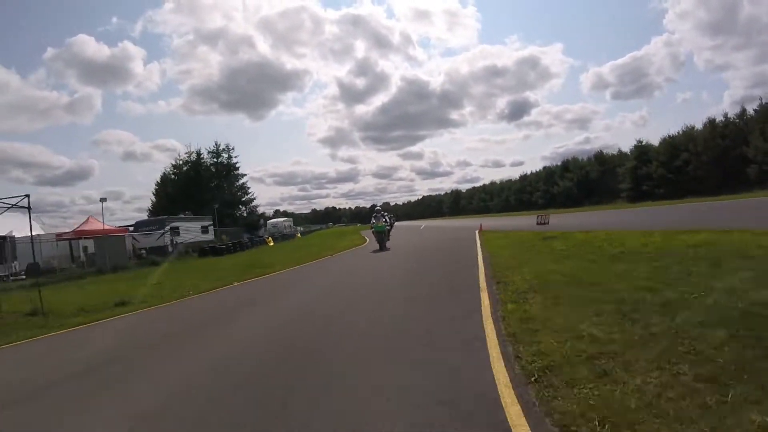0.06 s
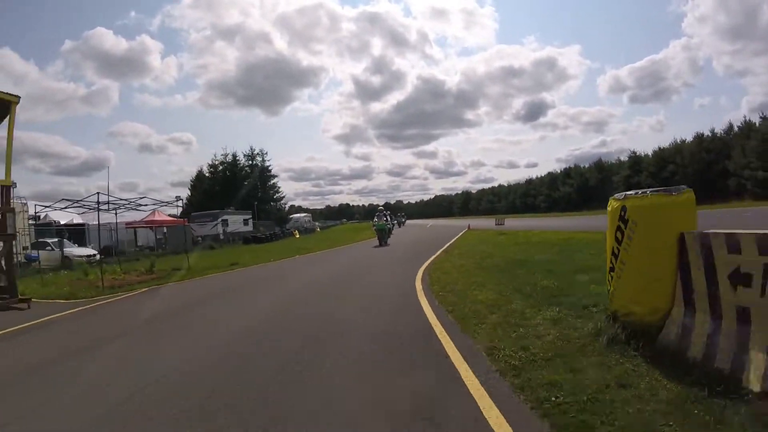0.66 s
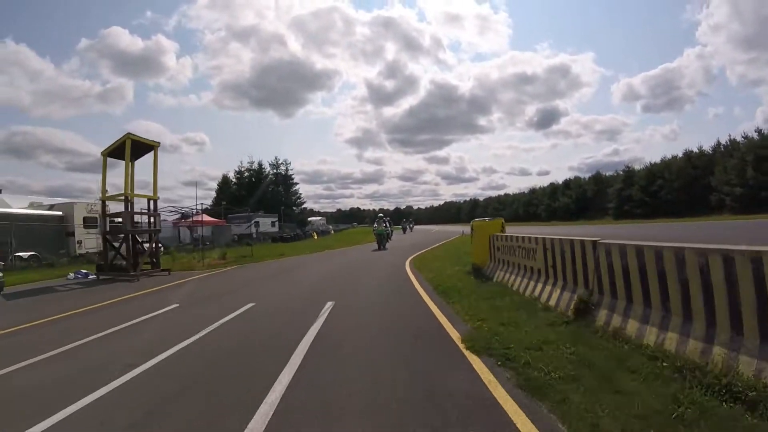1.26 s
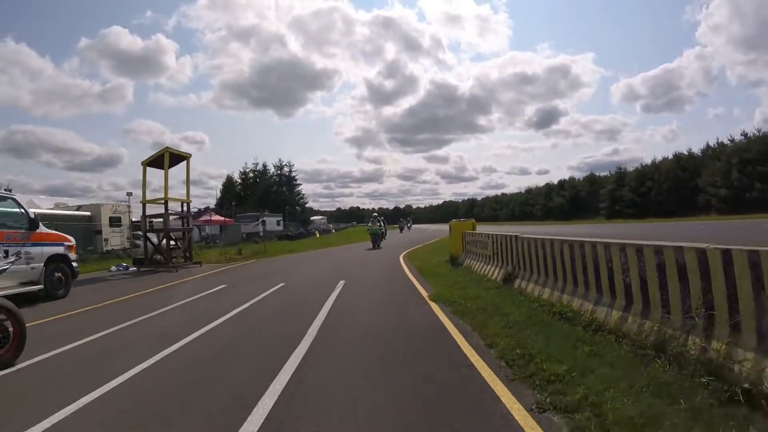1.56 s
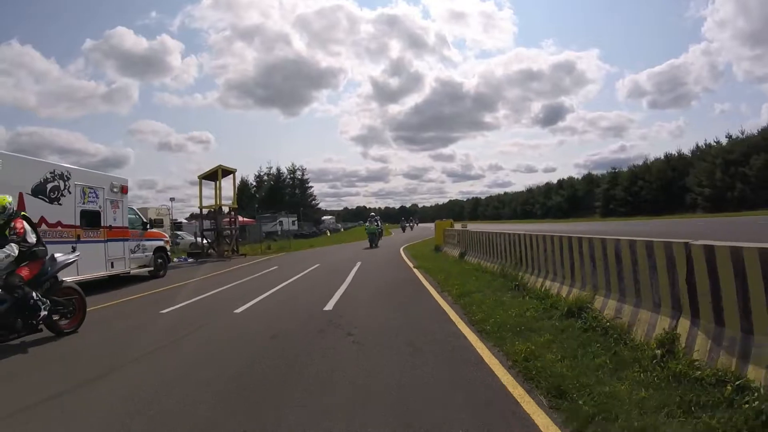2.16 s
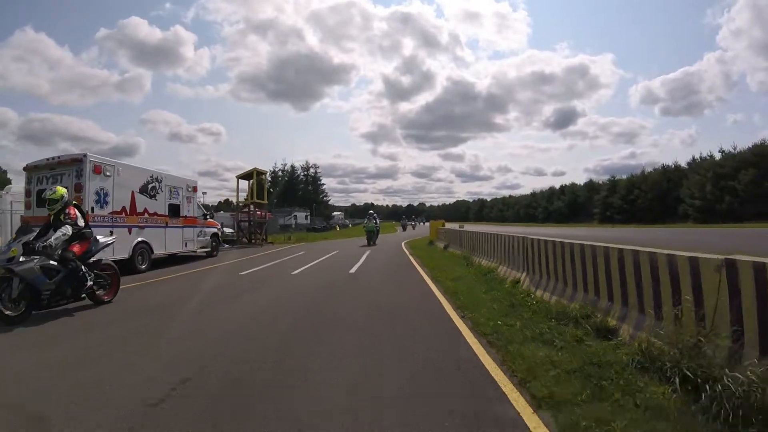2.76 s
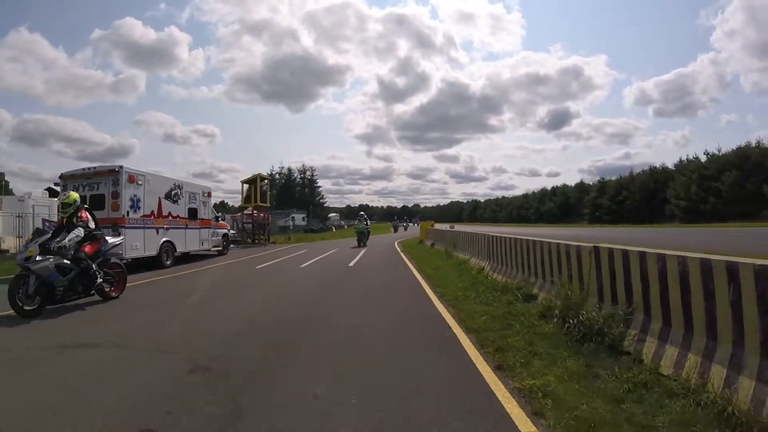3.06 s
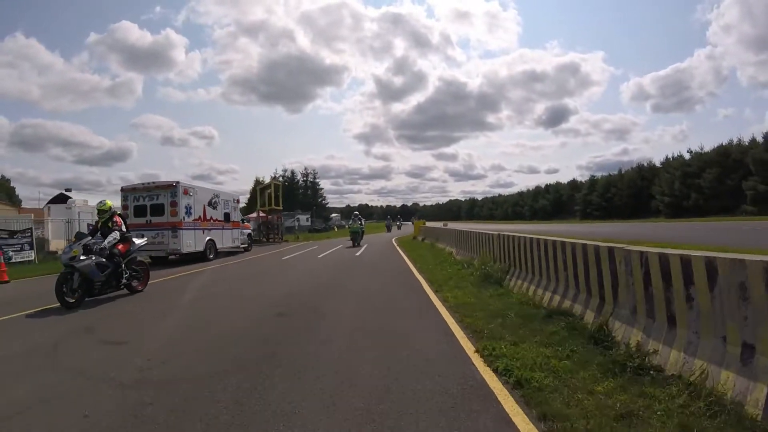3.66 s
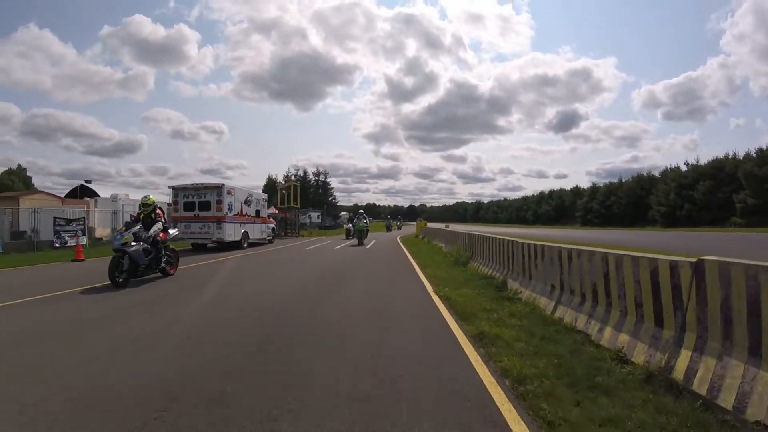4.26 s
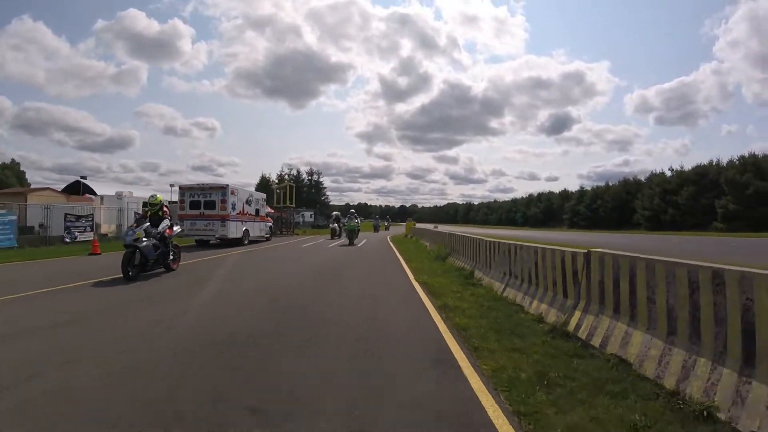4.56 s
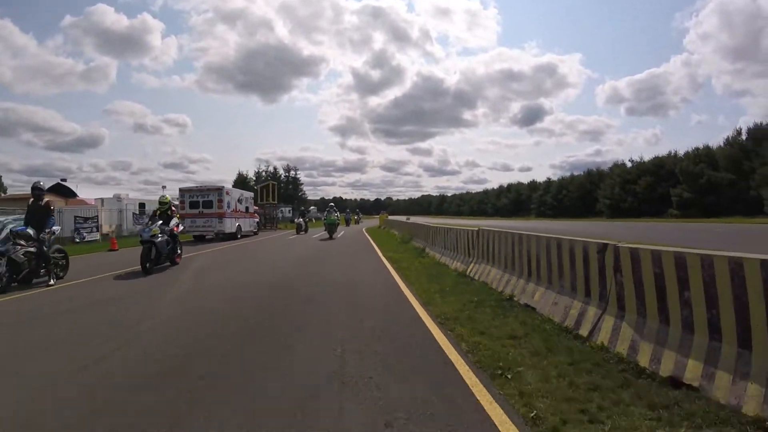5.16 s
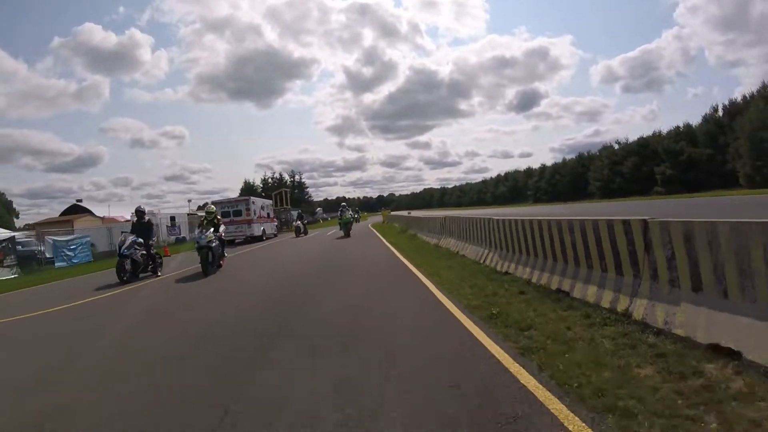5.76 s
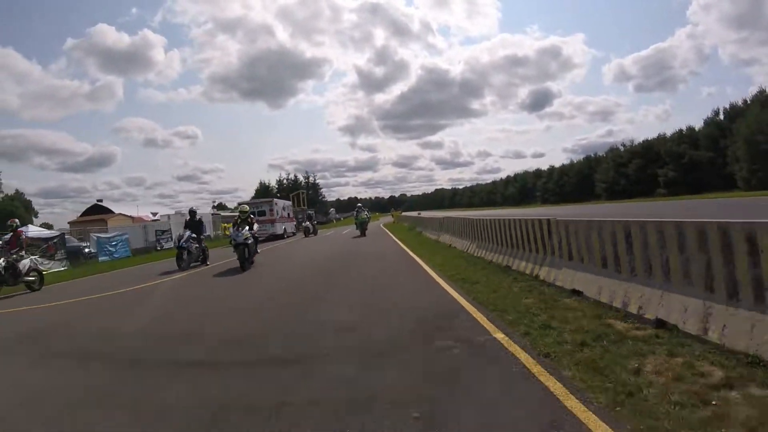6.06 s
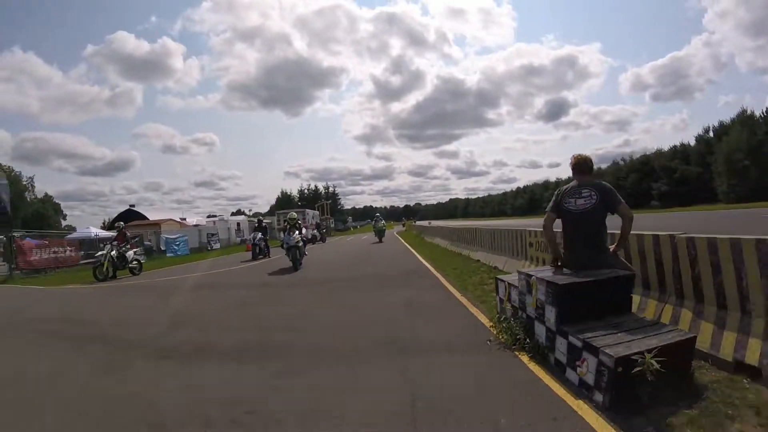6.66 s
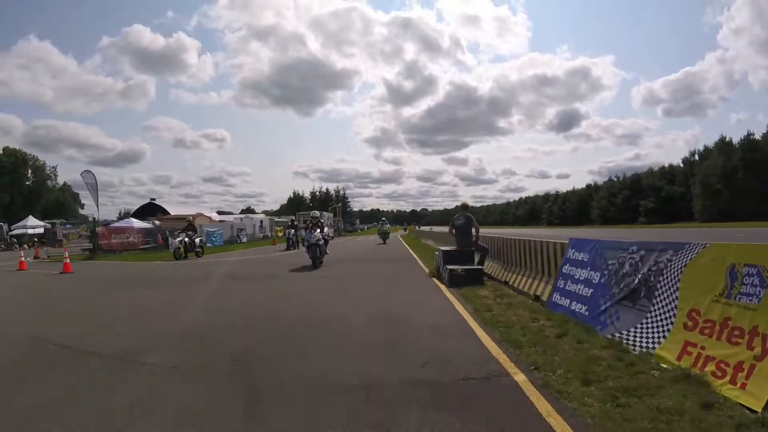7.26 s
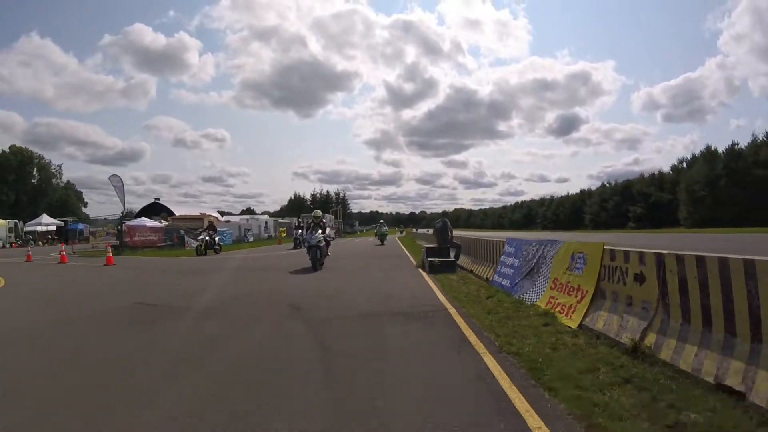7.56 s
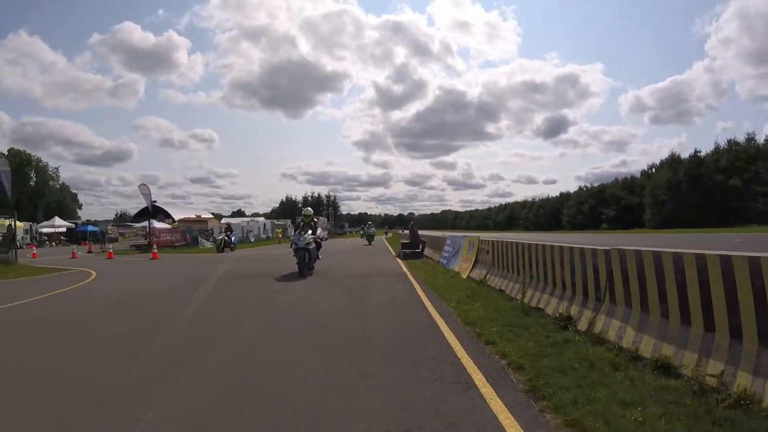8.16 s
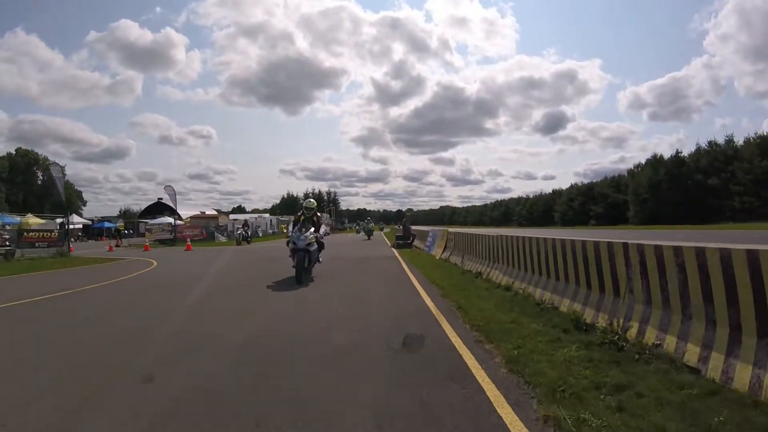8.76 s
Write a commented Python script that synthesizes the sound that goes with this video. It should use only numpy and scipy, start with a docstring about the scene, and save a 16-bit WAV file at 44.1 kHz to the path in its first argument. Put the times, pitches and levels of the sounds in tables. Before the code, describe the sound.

Close, on-board sound of a motorcycle moving slowly down a pit lane, with wind rumbling and tyres and chain hissing throughout. Its booming single-cylinder engine misfires as it slows, then idles with a metallic rattle while another bike's smoother drone sinks beside it. A sharp throttle blip leads into a short, louder pull. The revs fall to idle again as a second bike drones nearby, with a faint wash of idling engines behind.

```python
"""A single-cylinder motorcycle rolls slowly down a pit lane, heard from a small case fixed on the bike.
It coasts down with misfires to an idle, is blipped, pulls for two seconds and drops back.
Each firing sends a crack and a slower push of gas down the pipe, which barks and booms; in step with
the crank the gears whine, loose teeth and valves rattle and the frame shakes.
Two other bikes drone close by, over wind rumble, chain and tyre hiss and a wash of idling engines."""
import sys
import numpy as np
from scipy import signal
from scipy.fft import rfft, irfft, next_fast_len
from scipy.io import wavfile
from scipy.ndimage import uniform_filter1d, minimum_filter1d

SR = 44100
rng = np.random.default_rng(int(sys.argv[2]) if len(sys.argv) > 2 else 0)


def transcribe(u):
    """Save the signal u as a 16-bit wav file named by the first command-line argument.

    u: samples, shape (n,) or (channels, n), limited to [-1, 1]; the rate is SR.
    q: integer samples, one column per channel.
    """
    v = np.clip(np.atleast_2d(u).T, -1, 1)
    q = np.round(v * 32767).astype(np.int16)
    wavfile.write(sys.argv[1], SR, q)


N = 392490
TIME = np.arange(N) / SR
IDLE_HZ = 34   # firings per second

def from_db(db):
    """Decibels to gain."""
    return 10 ** (np.asarray(db) / 20)

def rms_one(x):
    """Scale to rms 1."""
    return x / np.sqrt(np.mean(x ** 2) + 1e-20)

def curve(rows, at=TIME, column=1):
    """One column of a breakpoint table, read at the given times."""
    columns = np.transpose(rows)
    return np.interp(at, columns[0], columns[column])

def lowpass(x, hz, order=2):
    """Butterworth low-pass."""
    return signal.sosfilt(signal.butter(order, hz, fs=SR, output="sos"), x)

def drift(rate_hz):
    """Smooth random modulation, rms 1."""
    return rms_one(lowpass(rng.standard_normal(N + SR), rate_hz)[SR:])

def noise(colour):
    """Noise of a given colour, rms 1."""
    hz, db = np.transpose(colour)
    size = next_fast_len(N, True)
    bins = np.maximum(np.fft.rfftfreq(size, 1 / SR), 1)
    gain = from_db(np.interp(np.log(bins), np.log(hz), db))
    return rms_one(irfft(rfft(rng.standard_normal(size)) * gain, size)[:N])

def resonate(x, modes):
    """Parallel resonators, each with its level at the peak."""
    out = np.zeros(N)
    for hz, width, db in modes:
        r = np.exp(-np.pi * width / SR)
        poles = [1, -2 * r * np.cos(2 * np.pi * hz / SR), r * r]
        out += from_db(db) * signal.lfilter((1 - r * r) / 2 * np.array([1, 0, -1]), poles, x + 1e-18)
    return out

def cycle_starts(cycles):
    """The samples at which a new engine cycle begins."""
    return np.flatnonzero(np.diff(np.floor(cycles)))

def puffs(at, sizes, rise_ms, lead_ms=0):
    """Smooth pulses that swell and die away; size is the area in pressure times ms."""
    train = np.zeros(N)
    train[np.clip(at - int(lead_ms * SR / 1000), 0, N - 1)] = sizes * SR / 1000
    r = np.exp(-1000 / (rise_ms * SR))
    return signal.lfilter([(1 - r) ** 2], [1, -2 * r, r * r], train + 1e-18)

# fader rides of the thin hiss and the engine wash: t/s, level/dB
SWELL_LEVEL = [(0, -80), (3.2, -68), (3.6, -57), (4.0, -53.5), (4.3, -72.5), (8.9, -77.5)]
WASH_LEVEL = [(0, -37.5), (1.6, -48.5), (2.8, -45), (3.6, -41.5), (4.1, -41), (4.5, -53.5), (8.9, -50)]
# their tone colours: f/Hz, level/dB
SWELL_COLOUR = [(2500, -24.5), (4200, -3), (5300, 0), (7000, -14.5), (9500, -19.5), (12000, -35.5)]
WASH_COLOUR = [(300, -11.5), (520, 0.5), (640, -6.5), (850, 0.5), (1070, -6.5), (1320, -5.5), (1600, -9.5),
               (3000, -17.5), (6000, -42)]

def parked_bikes():
    """A thin high hiss swells beside the parked bikes; their idling engines blur into a wash."""
    swell = from_db(curve(SWELL_LEVEL)) * noise(SWELL_COLOUR)
    wash = from_db(curve(WASH_LEVEL)) * noise(WASH_COLOUR)
    return swell + wash

# airflow over the case: t/s, level/dB
WIND_LEVEL = [(0, -25), (1.1, -23), (1.9, -25), (4.55, -23.5), (5.4, -33), (6.6, -32), (7, -26.5),
              (7.6, -29.5), (8.9, -27.5)]
# its tone colour: f/Hz, level/dB
WIND_COLOUR = [(15, -10.5), (30, 9), (52, 6.5), (80, 7.5), (120, 1.5), (250, 1.5), (380, -7), (550, -14.5),
               (1000, -56)]

def wind():
    """Air buffets the case into a low rumble."""
    return from_db(curve(WIND_LEVEL)) * noise(WIND_COLOUR)

# fader ride of the rolling hiss: t/s, level/dB
HISS_LEVEL = [(0, -45.5), (1.2, -43), (3.9, -42.5), (5.4, -41.5), (5.9, -45), (6.75, -41), (7.1, -47.5),
              (7.8, -47), (8.9, -43)]
# its tone colour: f/Hz, level/dB
HISS_COLOUR = [(300, 6.5), (620, 15.5), (870, 15.5), (1060, 12.5), (1300, 14.5), (1550, 9), (2100, 6.5),
               (2600, 6), (3300, 1.5), (3750, -4.5), (5000, 1.5), (6000, -0.5), (7200, -7.5), (8000, -13),
               (9400, -14.5), (10500, -21)]
# ring of the case: f/Hz, width/Hz, level/dB
CASE_MODES = [(2130, 150, -8), (3350, 200, -6), (6460, 230, 5)]

def chain_and_tyres(cycles, pulse_depth=.039, flicker_db=2):
    """Chain and tyres hiss through the ringing case, flickering and pulsing with the engine."""
    pulse = 1 + pulse_depth * np.cos(2 * np.pi * cycles - 1)
    hiss = noise(HISS_COLOUR) * pulse * from_db(flicker_db * drift(110))
    return from_db(curve(HISS_LEVEL)) * rms_one(hiss + resonate(hiss, CASE_MODES))

# two bikes close by, one track each: t/s, firing f/Hz, level/dB
NEIGHBOURS = [
    [(1.2, 177.8, -36.5), (1.5, 167, -27), (2.05, 137, -26), (2.5, 119.7, -29.5), (2.72, 112.9, -24),
     (3.5, 104, -21), (3.9, 104.5, -35), (4.3, 102, -42)],
    [(7.1, 178, -39), (7.5, 166.4, -26.5), (8.1, 151.7, -21.5), (8.5, 132.2, -25.5), (8.9, 111, -24)],
]

def neighbour(track, throb_db, throb_hz=3.9, throb_peak_s=3, overtone_db=-15):
    """A smooth multi-cylinder drone that sinks with its revs, with an optional slow throb."""
    phase = 2 * np.pi * np.cumsum(curve(track) * (1 + .006 * drift(12))) / SR
    drone = sum(from_db(overtone_db * k) * np.sin((k + 1) * phase) for k in range(3))
    heard = (TIME >= track[0][0]) & (TIME <= track[-1][0])
    throb = throb_db * np.cos(2 * np.pi * throb_hz * (TIME - throb_peak_s))
    return heard * from_db(curve(track, column=2) - 2 + throb + drift(14)) * rms_one(drone)

# frame shake, strongest at a crawl: t/s, level/dB
SHAKE_LEVEL = [(0, -45), (2.1, -38.5), (2.5, -20.5), (3.1, -20.5), (3.9, -22), (4.3, -43), (4.6, -53),
               (8.9, -48.5)]

def shake(cycles, uneven_db=1):
    """The unbalanced crank, two turns to a firing, rocks the frame unevenly."""
    return from_db(curve(SHAKE_LEVEL) + uneven_db * drift(6.2)) * np.sin(2 * np.pi * 2 * cycles)

def chatter(cycles, modes):
    """One short, uneven knock per cycle rings the metal; rms 1."""
    at = cycle_starts(cycles)
    knocks = puffs(at, from_db(rng.uniform(-2, 2, len(at))), rise_ms=2.8) * rng.standard_normal(N)
    return rms_one(resonate(knocks, modes))

# ring of the crankcase and of the cylinder head: f/Hz, width/Hz, level/dB
CRANKCASE_MODES = [(525, 50, 3), (810, 60, -2), (930, 55, 2.5), (1060, 70, 0), (1290, 110, 4),
                   (2120, 50, 0), (3320, 120, -11)]
HEAD_MODES = [(1050, 80, 1), (2120, 60, 1.5), (3320, 120, -12)]

def rattle(cycles, firing_hz, idle_db=-43, loss_db_per_hz=1.1):
    """Loose teeth knock at each firing and valves tick as they seat; both fade as the revs rise."""
    level_db = idle_db - loss_db_per_hz * np.maximum(firing_hz - IDLE_HZ, 0)
    teeth = chatter(cycles, CRANKCASE_MODES)
    valves = from_db(-5) * chatter(cycles - .72, HEAD_MODES)   # late in the cycle
    return from_db(level_db) * lowpass(teeth + valves, 3200)

# whine at the tooth rate, its octave (strongest as the wheel drives the engine)
# and its third partial (heard coasting down): t/s, level/dB
WHINE_ROOT = [(0, -43.5), (.9, -43), (1.4, -39.5), (2.2, -44), (3.2, -51), (4.1, -46.5), (4.45, -46),
              (4.7, -45), (5.1, -43), (6, -51), (6.5, -52.5), (6.95, -43.5), (7.2, -44.5), (7.8, -54),
              (8.9, -46.5)]
WHINE_OCTAVE = [(0, -55), (.7, -56), (.78, -49), (.85, -62), (.92, -52), (1.2, -51), (1.3, -45),
                (1.55, -48.5), (2.33, -49), (2.6, -60), (4.1, -60), (4.4, -54), (4.7, -56), (5.15, -51),
                (5.4, -62), (5.6, -54), (6.1, -61), (6.35, -55), (6.75, -52.5), (7, -57), (7.1, -50.5),
                (7.5, -55), (7.8, -64)]
WHINE_THIRD = [(0, -65), (.8, -65), (.9, -57.5), (1.45, -56.5), (1.6, -61), (2.2, -62), (2.6, -74)]
# pitch bends as the drive snatches: t/s, bend/share of gear speed
LURCHES = [(.78, -.04), (.855, .05), (.97, .03), (1.45, .02), (1.52, .03), (1.58, -.025), (1.63, .04),
           (1.69, -.025), (1.765, .045), (1.82, -.025), (1.89, .075), (1.96, -.035), (2.17, .06),
           (2.22, -.03), (2.32, .07), (5.02, .025), (5.17, -.02), (5.42, .02), (6.16, .04), (6.27, -.025),
           (6.76, -.035), (6.87, .025), (6.96, .04)]

def gears(cycles, firing_hz, teeth_per_firing=30.5, lurch_s=.024, wander_db=1.8):
    """Tooth whine bends with each lurch and flutters with the crank; backlash smears it at high revs."""
    lurch = sum(share * np.exp(-.5 * ((TIME - s) / lurch_s) ** 2) for s, share in LURCHES)
    crank = 2 * np.pi * cycles
    flutter = .55 * np.sin(crank) + .85 * drift(20)
    mesh = 2 * np.pi * teeth_per_firing * np.cumsum(firing_hz * (1 + lurch)) / SR + flutter
    backlash = np.minimum(1.2 * (firing_hz / 80) ** 3, 1.2)
    whine = np.zeros(N)
    for k, levels in enumerate((WHINE_ROOT, WHINE_OCTAVE, WHINE_THIRD), 1):
        gain = from_db(curve(levels) + wander_db * drift(12))
        tone = np.sin(k * mesh + backlash * drift(70))
        roughness = 1 + .4 * drift(130)
        whine += gain * tone * roughness
    throb = 1 + .45 * np.cos(crank)
    return lowpass(whine * throb, 6200, order=4)

# the rev line: t/s, firing f/Hz
REVS = [(0.0, 64.27), (0.33, 63.24), (.62, 62.5), (.77, 57.6), (.88, 60), (1.22, 57.36), (2.2, 42.24),
        (2.94, 35.37), (4.11, 32.76), (4.29, 69.61), (4.44, 87.36), (4.66, 57.31), (4.9, 80.03),
        (5.17, 88.4), (5.34, 99.8), (5.49, 100.8), (5.65, 88.6), (5.8, 82.7), (6.03, 80.86), (6.4, 69.52),
        (6.76, 78.82), (7.14, 51.53), (7.66, 33.78), (8.9, 34.54)]

def engine_speed(flywheel_s=.07):
    """Firings per second, the corners rounded by the flywheel."""
    return uniform_filter1d(curve(REVS), size=int(flywheel_s * SR), mode="nearest")

# stretches with the throttle shut: start t/s, end t/s
OVERRUN = [(.745, 1.955), (2.065, 2.09), (4.447, 4.7), (6.815, 7.07)]

def throttle_shut(when):
    """1 on the overrun, else 0."""
    return sum((when > start) & (when <= end) for start, end in OVERRUN)

# bursts of overrun pops: t/s, count, spacing/cycles, level/dB, growth per pop/dB
POPS = [(.805, 2, 1, 1.5, -5), (.885, 2, 1, 3.5, -7), (.953, 2, 1, 4, -8), (1.02, 2, 1, -9, 1),
        (1.072, 1, 1, 1, 0), (1.106, 6, 2, -2, .4), (1.316, 4, 2, -1, 0), (1.5, 3, 1, 0, .5),
        (1.596, 4, 1, -4, 2), (1.714, 4, 1, -3, 1.5), (1.837, 4, 1, -3, 2.3), (4.677, 1, 1, -1, 0),
        (6.86, 1, 1, -3, 0), (6.875, 2, 1, 1.5, -5), (6.948, 1, 1, 0, 0), (7.01, 2, 1, -5, 0),
        (7.062, 1, 1, -2, 0)]

def burning(when, pop_trim_db=-1):
    """Which cycles ignite, and their extra dB: all under throttle, only the pops on the overrun."""
    burns, extra_db = throttle_shut(when) == 0, np.zeros(len(when))
    for s, count, spacing, db, growth_db in POPS:
        k = np.arange(int(count))
        caught = np.argmin(np.abs(when - s)) + int(spacing) * k
        burns[caught] = True
        extra_db[caught] = pop_trim_db + db + growth_db * k
    return burns, extra_db

def surging(cycles, kick_hz=1.6):
    """Among misfires each burn kicks the crank faster and each dead cycle lets it sag."""
    when = cycle_starts(cycles) / SR
    burns = burning(when)[0].astype(float)
    gained = np.cumsum(burns - uniform_filter1d(burns, size=9))
    ripple_hz = kick_hz * (gained - uniform_filter1d(gained, size=9))
    return cycles + np.cumsum(np.interp(TIME, when, ripple_hz)) / SR

# how hard the engine works for its speed: t/s, level/dB
EFFORT = [(0, 3), (.5, 2), (.72, -1.5), (.9, 0.5), (1.4, 3.5), (2.6, 1), (4.15, 3.5), (5.1, 3.5), (5.5, -1),
          (5.95, -2), (6.7, 0), (7.3, -2.5), (8.9, 1.5)]

def load(firing_hz, pull_hz_per_s=95, lean_below_hz=69.5):
    """Effort, crack and push in dB, leanness 0-1: at idle the crack fades and the push is strongest."""
    effort_db = curve(EFFORT)
    above_idle_hz = np.maximum(firing_hz - IDLE_HZ, 0)
    pull = np.tanh(np.gradient(firing_hz) * SR / pull_hz_per_s)
    crack_db = 2 + .53 * effort_db - 28.5 * np.exp(-above_idle_hz / 16.4) - pull
    push_db = -4 + effort_db - 12 * (above_idle_hz / 60) ** 2
    lean = np.clip((lean_below_hz - firing_hz) / 3.7, 0, 1) * (1 - np.maximum(pull, 0))
    return np.array([effort_db, crack_db, push_db, lean])

# low body of the pipe: f/Hz, width/Hz, level/dB
BOOM_MODES = [(34.2, 21, -8), (72, 33, -6), (105.8, 35.5, 1.5), (142, 56, -3.5), (201.5, 33, -6.5),
              (278, 61, 2.5), (327, 270, -20.5)]

def boom(flow):
    """The piston's slow shove of gas rings the pipe's low modes."""
    return lowpass(resonate(flow, BOOM_MODES), 325, order=4)

# dead notes of the silencer: f/Hz, width/Hz
NULLS = [(622, 51), (1075, 16)]

def silencer(x):
    """Notches where waves from the two ends of the silencer cancel."""
    for hz, width in NULLS:
        x = signal.lfilter(*signal.iirnotch(hz, hz / width, fs=SR), x)
    return x

# open ring of pipe and silencer: cool f/Hz, width/Hz, level/dB, change when hot/dB
PIPE_MODES = [(130, 10, -16.5, -2), (202, 79, -1.5, 2.5), (313.6, 30, -1.5, 3.5), (361.3, 48.5, 8, 0),
              (407.7, 53, -7, -11.5), (477.4, 48, 2.5, 1), (517, 16, -5.5, 4), (674, 48, -2.5, -3.5),
              (778, 35, -5, 1), (852, 67, -9, -7.5), (945, 30, -5, 3), (1168, 117, -1, -1),
              (1275, 27, 2.5, 1.5), (1328, 15, -6, -9), (1710, 200, -9.5, 6), (2730, 860, -34.5, 1.5)]
# hollow ring with the throttle nearly shut: f/Hz, width/Hz, level/dB
HOLLOW_MODES = [(367, 25, 16.5), (924, 36, 5), (1337, 42, 6.5)]

def bark(blast, suck, heat, firing_hz, hot_rise=.042, hollow_below_hz=65.6):
    """Sharp gas pulses ring the pipe: higher when hot, hollow at low revs and on dead cycles."""
    cool_pipe = [mode[:3] for mode in PIPE_MODES]
    hot_pipe = [(hz * (1 + hot_rise), width, db + hot_db) for hz, width, db, hot_db in PIPE_MODES]
    gas = blast + suck
    open_ring = resonate(gas * (1 - heat), cool_pipe) + resonate(gas * heat, hot_pipe)
    coasting = np.clip((hollow_below_hz - firing_hz) / 5.6, 0, 1)
    hollow = resonate(suck + from_db(-5) * coasting * blast, HOLLOW_MODES)
    return lowpass(silencer(from_db(-2 * coasting) * open_ring + hollow), 2400)

def exhaust(cycles, firing_hz, jitter_ms=.083, hot_from_hz=75.7,
            dead_crack_db=-27, dead_push_db=-8, pop_push_db=-2):
    """Each cycle the valve lets out a turbulent crack and a slower push; the pipe barks and booms."""
    at = cycle_starts(cycles)
    effort_db, crack_db, push_db, lean = load(firing_hz)[:, at]
    crack_luck, push_luck, draw_luck, timing_luck = rng.standard_normal((len(at), 4)).T
    at = at + (timing_luck * jitter_ms * SR / 1000).astype(int)
    burns, pop_db = burning(at / SR)
    shut = throttle_shut(at / SR)
    lean = lean * (1 - .5 * shut)
    spread_db = 1.3 * lean   # a lean mixture burns unevenly
    cracks = from_db(crack_db + spread_db * crack_luck + np.where(burns, pop_db, dead_crack_db))
    pushes = from_db(push_db + spread_db * push_luck + np.where(burns, pop_push_db * shut, dead_push_db))
    # the harder and hotter a cycle burns, the steeper its front: top revs turn raspy
    heat = np.clip((firing_hz - hot_from_hz) / 25.3, 0, 1)
    scatter = (.15 + .022 * lean) * crack_luck
    steep = np.clip(.17 + .02 * effort_db + .099 * heat[at] ** 2 + scatter, 0, 1)
    sharp_crack = puffs(at, cracks * steep, rise_ms=.17)
    soft_crack = puffs(at, cracks * (1 - steep), rise_ms=.4, lead_ms=.25)
    jet = puffs(at, cracks * steep, rise_ms=.8) * lowpass(rng.standard_normal(N), 1900, order=4)
    blast = sharp_crack + soft_crack + jet
    push = puffs(at, pushes, rise_ms=.75, lead_ms=2.52)
    # the intake gulps half a cycle later, whether the charge burns or not
    gulp = puffs((at[:-1] + at[1:]) // 2, -from_db(push_db - 15 + 2.1 * draw_luck)[:-1], rise_ms=1)
    # a dead cycle sucks gas back from the pipe, which still rings it dully
    suck = puffs(at, -from_db(-11 + 2 * draw_luck) * ~burns, rise_ms=.7)
    return from_db(-7.5) * bark(blast, suck, heat, firing_hz) + from_db(1.5) * boom(push + gulp)

def scene():
    """One crank drives exhaust, gears, rattle and shake, over the bed of the lane and two other bikes."""
    firing_hz = engine_speed()
    cycles = surging(np.cumsum(firing_hz) / SR - .14 + firing_hz * .0011)
    engine = exhaust(cycles, firing_hz)
    mechanics = gears(cycles, firing_hz) + rattle(cycles, firing_hz) + shake(cycles)
    others = neighbour(NEIGHBOURS[0], throb_db=5.5) + neighbour(NEIGHBOURS[1], throb_db=0)
    bed = wind() + chain_and_tyres(cycles) + parked_bikes()
    return (bed + others + mechanics + engine)[None]

def limiter(x, ceiling=.51, release_db_per_s=250):
    """Ducks just ahead of each peak over the ceiling and recovers quickly."""
    over_db = 20 * np.log10(np.maximum(np.abs(x) / ceiling, 1))
    ramp = release_db_per_s * TIME
    held_db = np.maximum.accumulate(over_db + ramp, axis=-1) - ramp
    return x * from_db(uniform_filter1d(minimum_filter1d(-held_db, size=65), size=65))

def record(dry, low_cut_hz=12, high_cut_hz=10900):
    """The case delays the deep bass, so pulses swing up, then sharply down; low cut, limiter, high cut."""
    r = np.exp(-2 * np.pi * 35 / SR)   # all-pass turning at 35 Hz
    cased = signal.lfilter([r, -1], [1, -r], dry)
    trimmed = signal.sosfilt(signal.butter(1, low_cut_hz, "high", fs=SR, output="sos"), cased)
    return signal.sosfilt(signal.cheby2(12, 60, high_cut_hz, fs=SR, output="sos"), limiter(trimmed))

dry = scene()
out = record(dry)
transcribe(out)
```